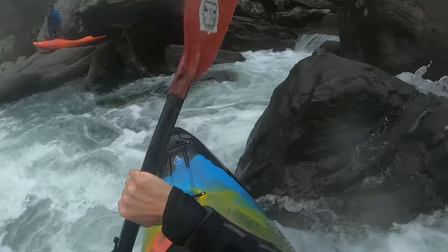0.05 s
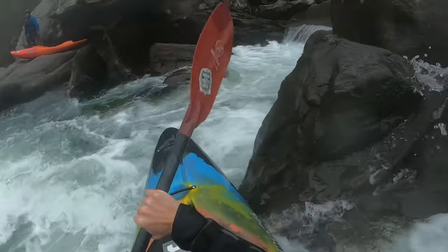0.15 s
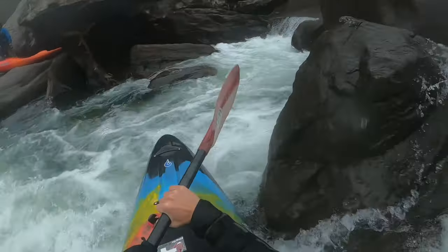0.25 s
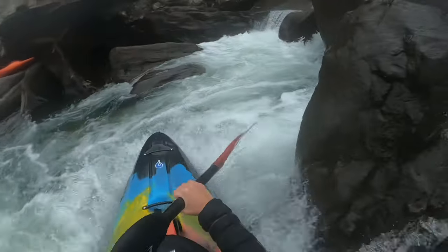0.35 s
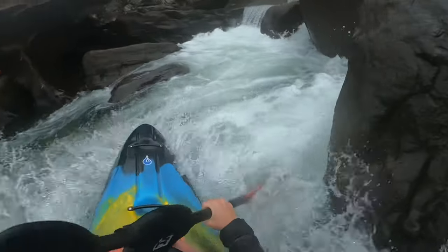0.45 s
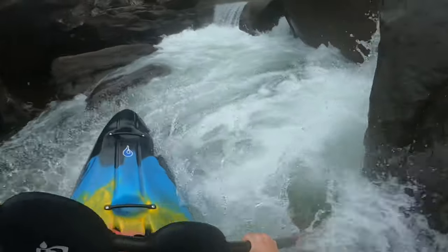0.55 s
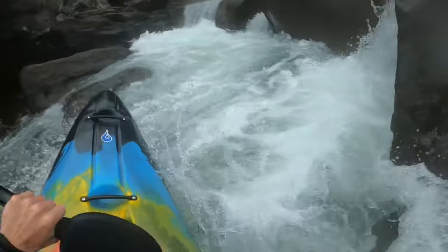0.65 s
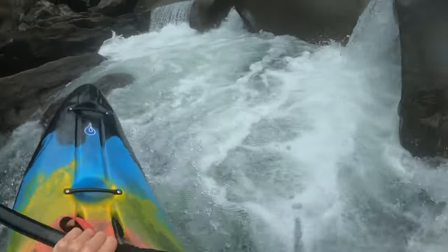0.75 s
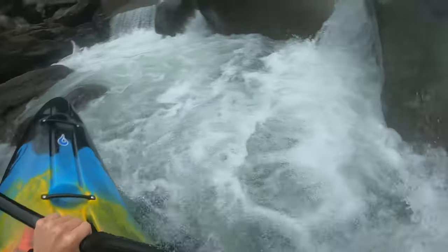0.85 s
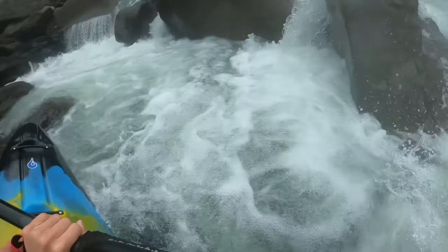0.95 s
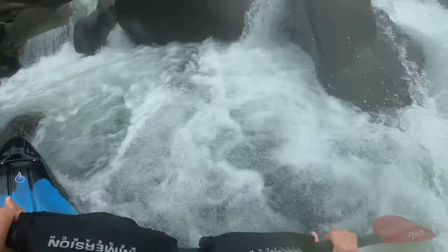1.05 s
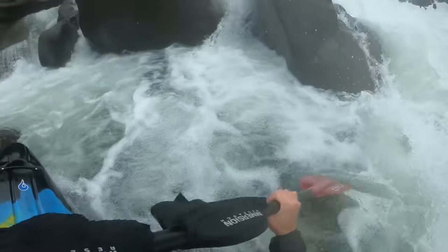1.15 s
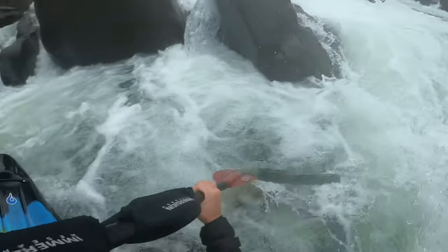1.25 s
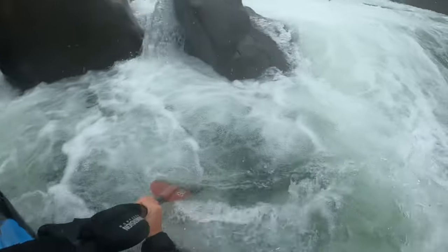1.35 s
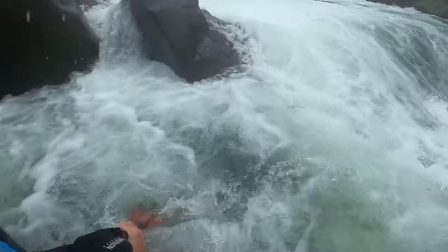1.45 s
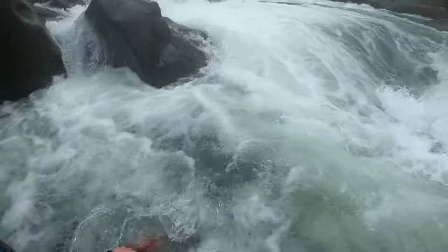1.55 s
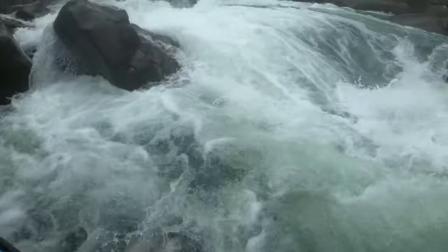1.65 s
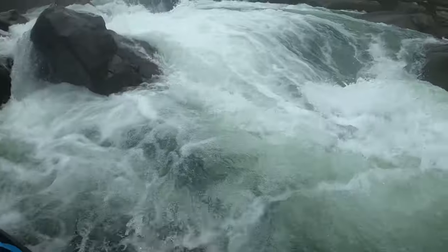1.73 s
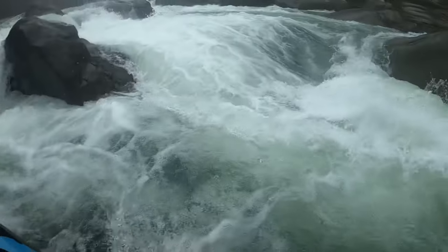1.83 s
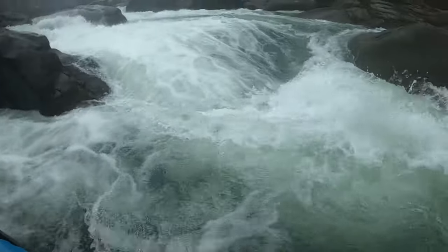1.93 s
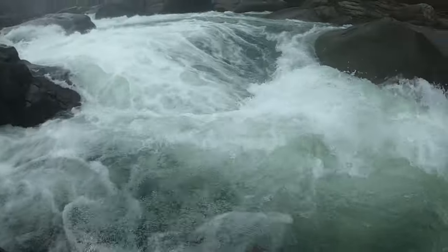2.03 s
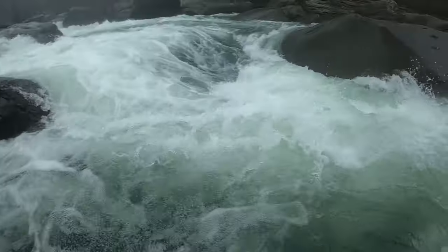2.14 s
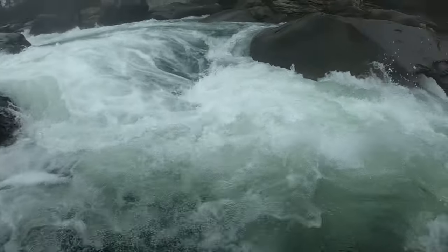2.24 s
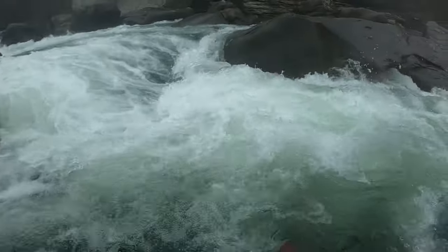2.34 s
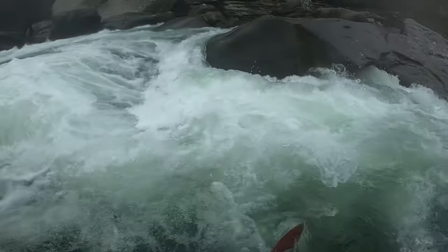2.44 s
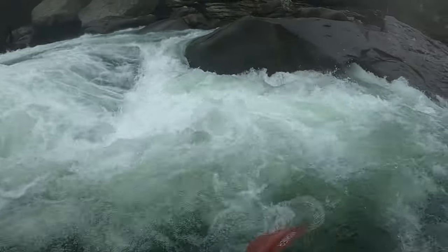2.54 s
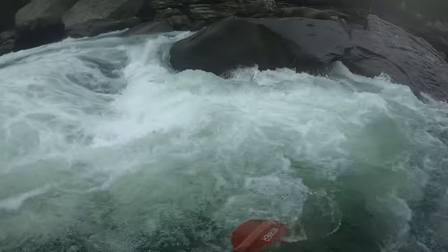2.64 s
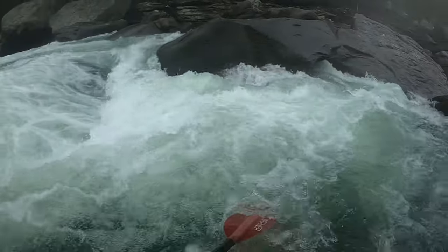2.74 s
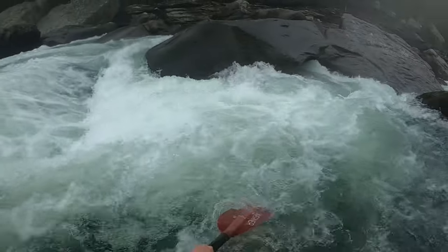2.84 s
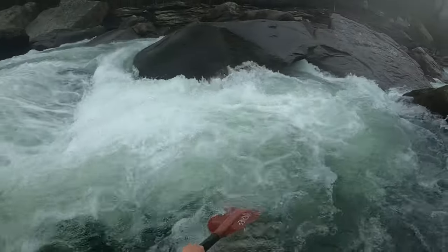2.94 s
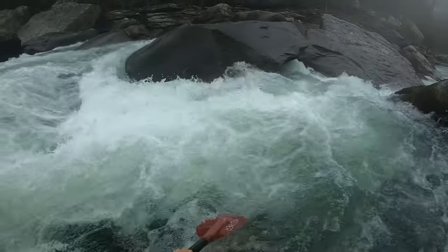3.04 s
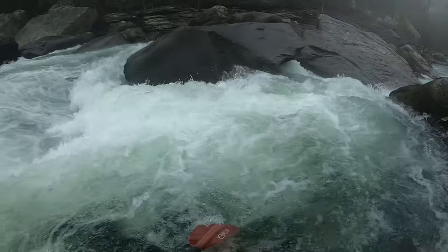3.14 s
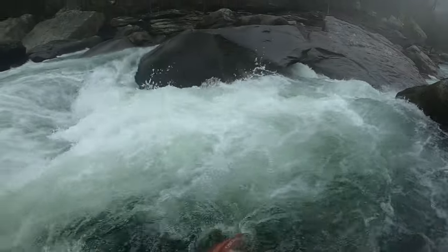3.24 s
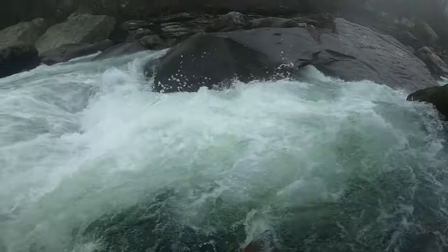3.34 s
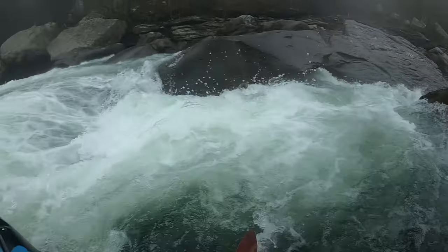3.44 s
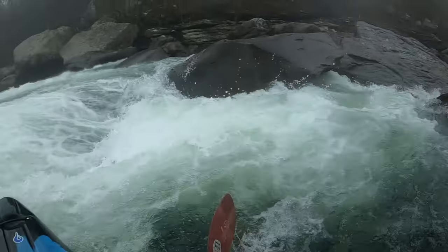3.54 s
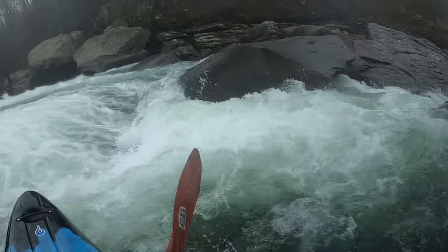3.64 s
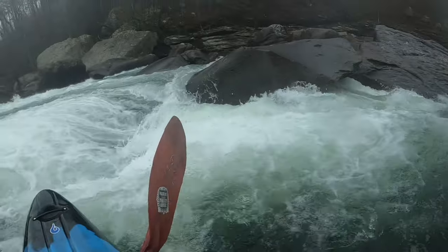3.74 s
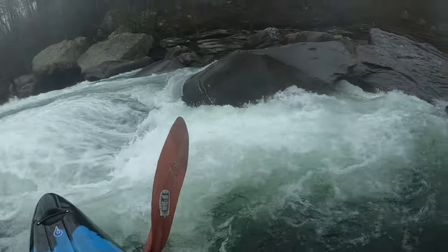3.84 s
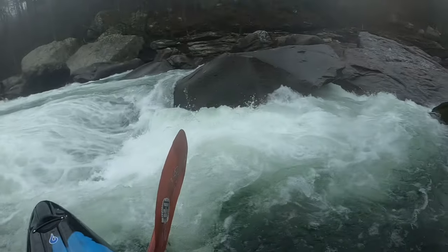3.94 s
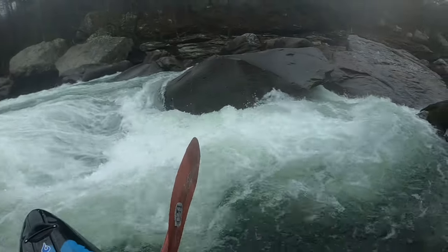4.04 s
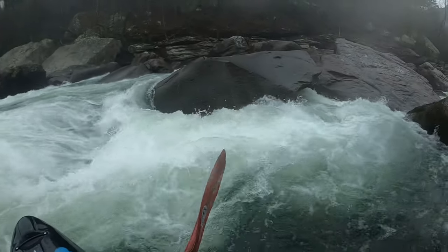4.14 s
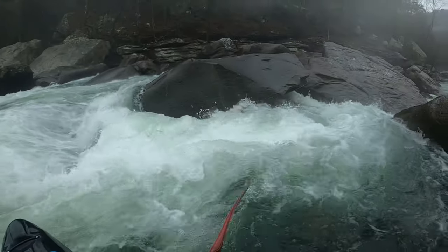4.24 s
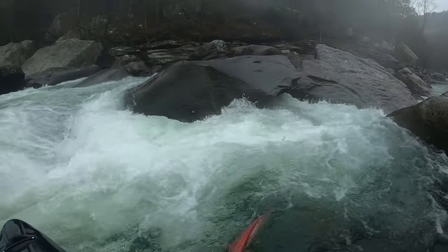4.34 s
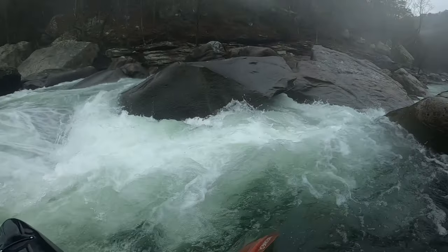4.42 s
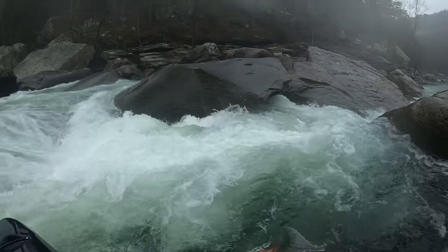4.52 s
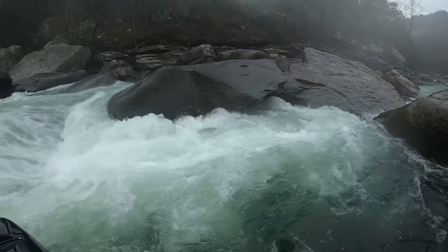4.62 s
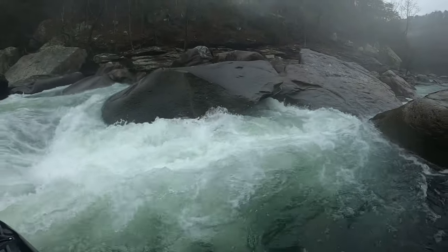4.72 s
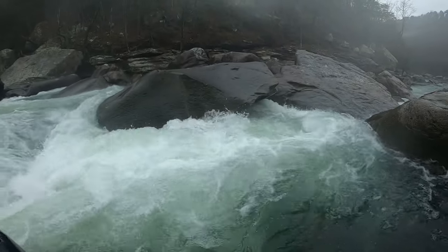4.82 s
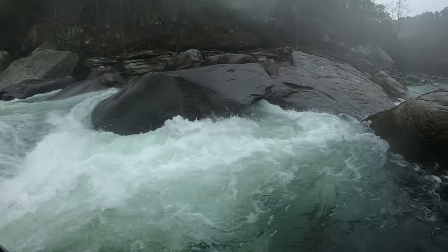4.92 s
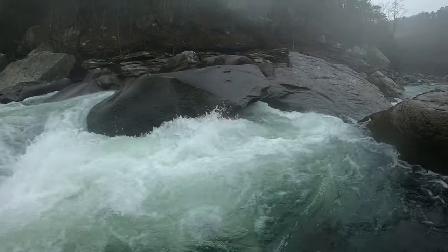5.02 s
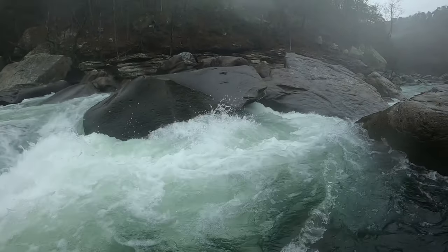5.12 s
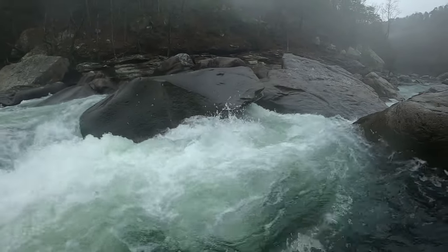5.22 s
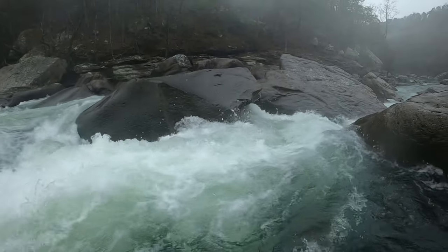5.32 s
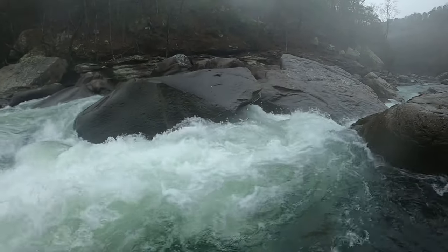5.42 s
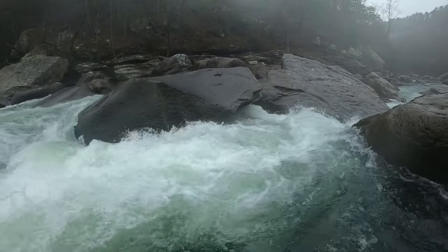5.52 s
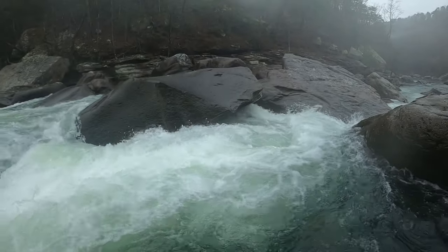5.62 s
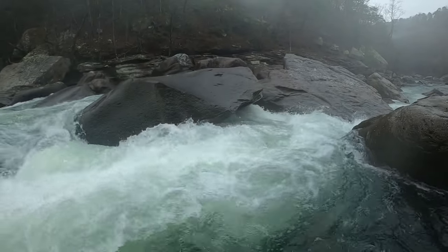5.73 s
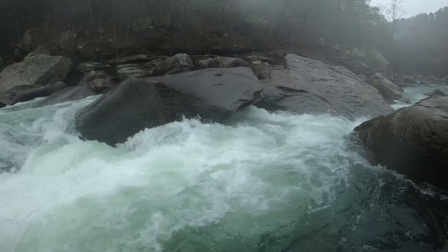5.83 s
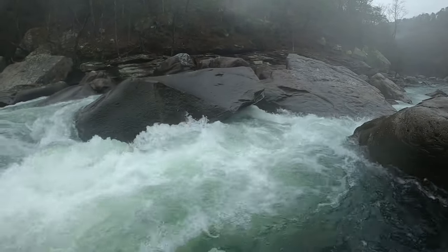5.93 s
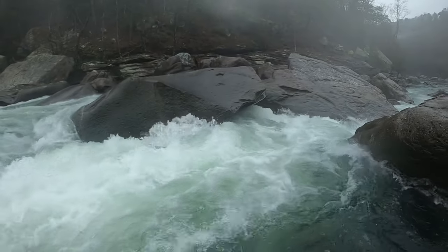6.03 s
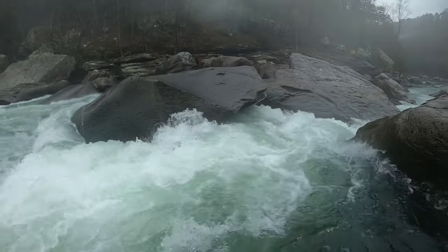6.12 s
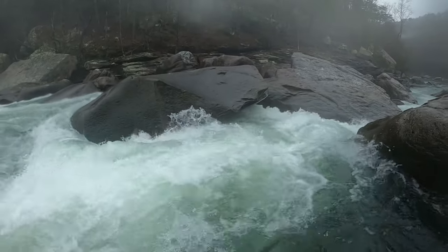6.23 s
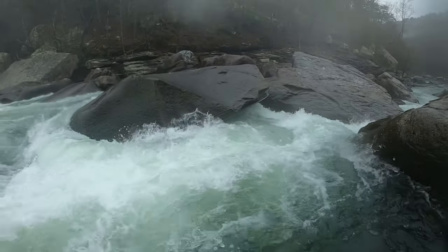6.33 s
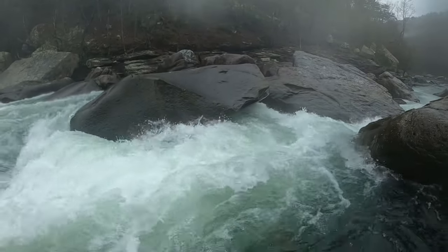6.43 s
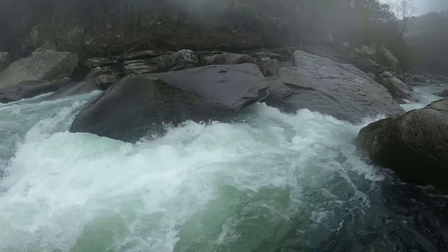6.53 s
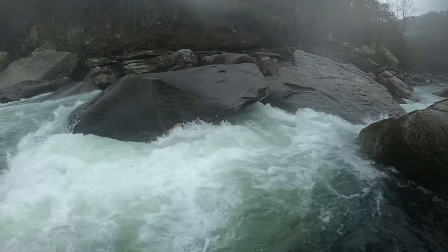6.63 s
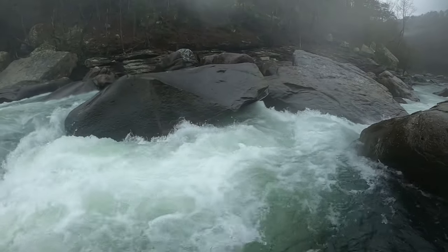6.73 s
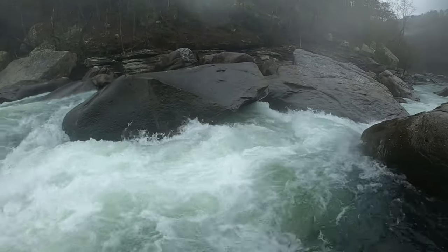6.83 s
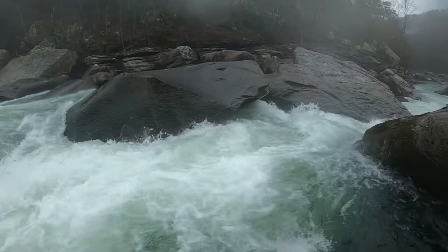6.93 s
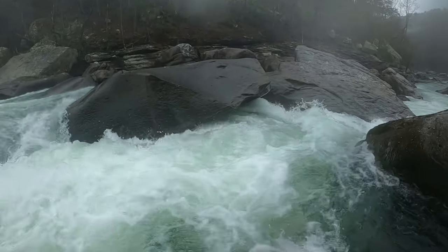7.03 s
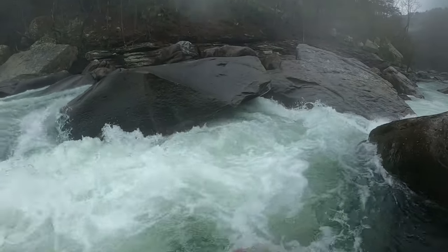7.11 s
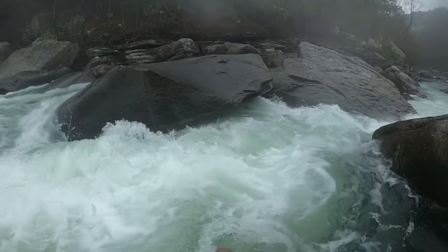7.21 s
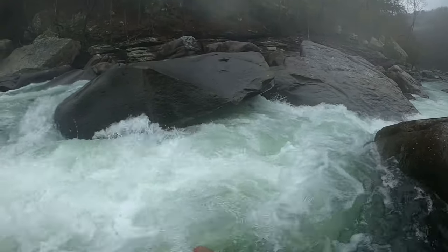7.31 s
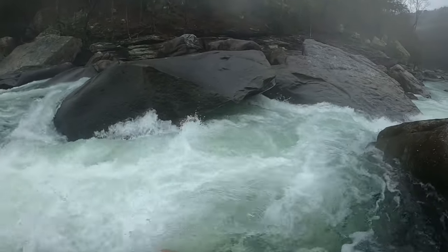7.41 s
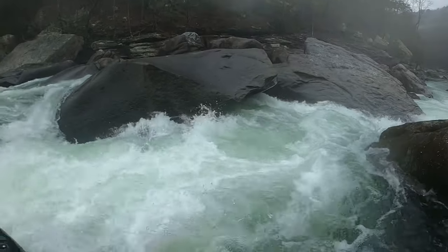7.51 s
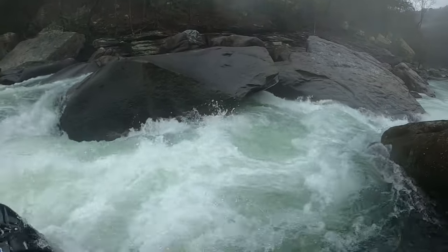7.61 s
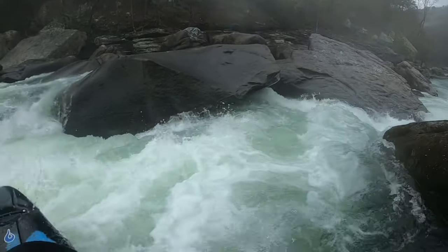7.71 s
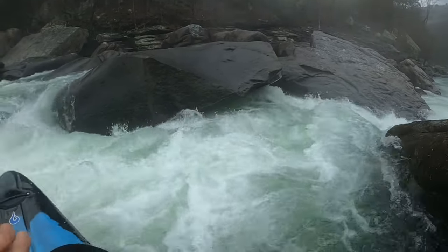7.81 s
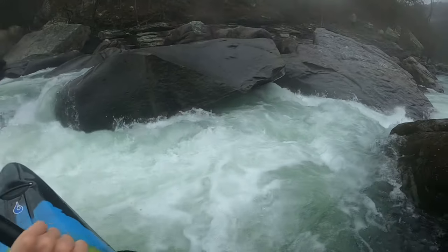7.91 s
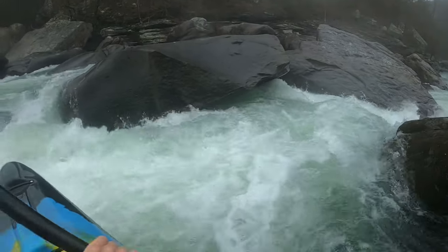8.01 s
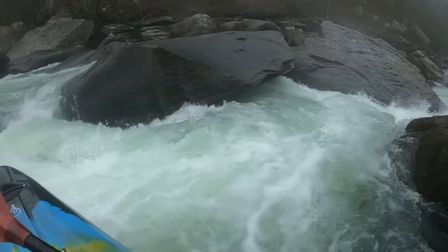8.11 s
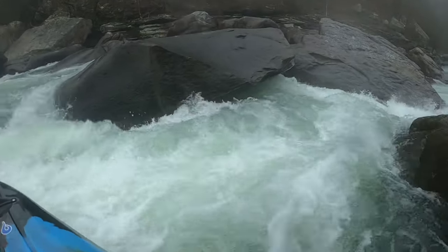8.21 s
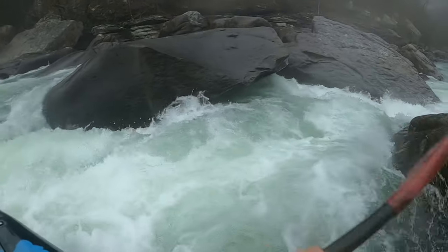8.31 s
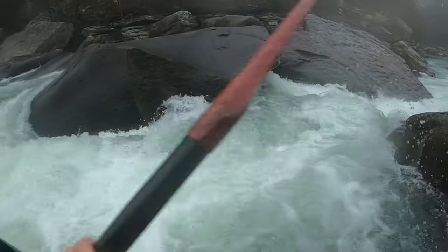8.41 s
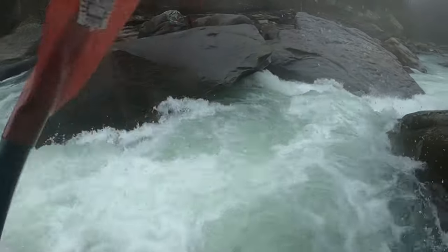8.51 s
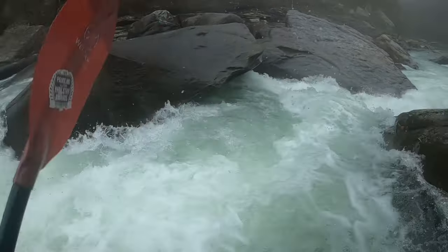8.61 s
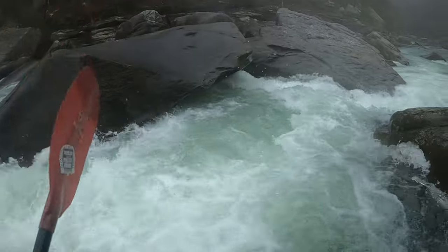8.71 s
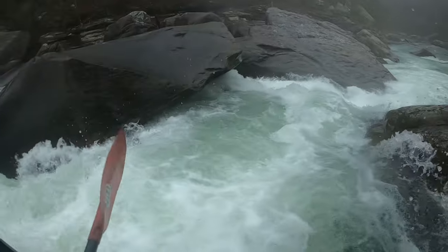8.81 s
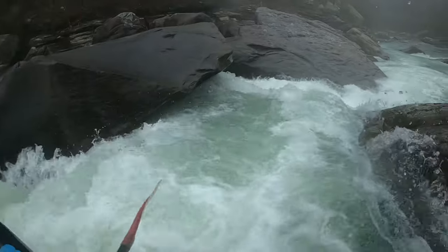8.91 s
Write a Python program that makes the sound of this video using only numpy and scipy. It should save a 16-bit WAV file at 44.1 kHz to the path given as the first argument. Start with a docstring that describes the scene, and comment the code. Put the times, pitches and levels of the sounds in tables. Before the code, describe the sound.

Outdoors in close whitewater, stereo and slightly boxy from the camera housing. It opens with clustered sharp splashes, knocks and deep thuds over broadband rushing, briefly ducked by the peaks. The foamy, bubbling churn then grows and holds wide and loud, with small blips of trapped air and soft wind buffeting. Low gurgles appear late, then the loudest smack hits and the river suddenly sounds quieter.

```python
"""A kayak runs a rapid, heard at the two microphone ports of a camera worn by the paddler.
In the first 1.6 s water slaps crack and thump amid rattling spray, ringing air pockets and gusts; the heard level sinks.
The level of the river, noise plus ringing bubbles, then rises until 4.6 s, with a few air pockets and a gust or two.
From 6.3 s come light spray, a faint slap and low glugs; at 8.7 s the hardest slap lands and the heard level drops.
A limiter ducks everything under the loudest peaks."""
import sys
import numpy as np
from scipy import signal
from scipy.fft import rfft, irfft
from scipy.io import wavfile
from scipy.ndimage import uniform_filter1d

SR = 44100
rng = np.random.default_rng(int(sys.argv[2]) if len(sys.argv) > 2 else 0)


def wrap_up_sound(samples):
    """Save the sound to the file named by the first command line argument, as 16-bit audio."""
    columns = np.atleast_2d(samples).T
    # keep every value between -1 and 1, then stretch to whole-number steps
    tamed = np.clip(columns, -1, 1)
    steps = np.round(tamed * 32767).astype(np.int16)
    wavfile.write(sys.argv[1], SR, steps)


N = 395136
TIME = np.arange(N) / SR
BINS_HZ = np.maximum(np.fft.rfftfreq(N, 1 / SR), 1)


def from_db(db):
    """Decibels to amplitude gain."""
    return 10 ** (np.asarray(db) / 20)


def rms_one(x):
    """Scale to unit power."""
    return x / np.sqrt(np.mean(x ** 2) + 1e-20)


def in_time(rows):
    """Interpolate each value column of a time curve to every sample."""
    time_s, *columns = np.transpose(rows)
    return [np.interp(TIME, time_s, column) for column in columns]


def over_bins(hz, values):
    """Join points by straight lines on a log-frequency axis."""
    return np.interp(np.log(BINS_HZ), np.log(hz), values)


def drift(rate_hz):
    """Slow chance of spread 1: noise through two equal poles, drawn at every 40th sample."""
    pole = np.exp(-80 * np.pi * rate_hz / SR)
    noise = rng.standard_normal(N // 40 + 2002)
    slow = signal.lfilter([1], [1, -2 * pole, pole * pole], noise)[2000:]  # settled part
    return np.interp(np.arange(N) / 40, np.arange(len(slow)), rms_one(slow))


def low_pass(x, cutoff_hz, order=2):
    """Causal Butterworth low-pass."""
    sos = signal.butter(order, min(cutoff_hz, SR / 2 - 1), fs=SR, output="sos")
    return signal.sosfilt(sos, x + 1e-18)


def ring(x, pitch_hz, t60_s):
    """Two-pole resonator: a unit click starts a decaying sine of height 1."""
    pole = from_db(-60 / (t60_s * SR))
    angle = 2 * np.pi * pitch_hz / SR
    return signal.lfilter([0, np.sin(angle)], [1, -2 * pole * np.cos(angle), pole * pole], x + 1e-18)


def add(track, start_s, sound):
    """Mix a sound into a track from start_s on."""
    start = max(round(start_s * SR), 0)
    track[..., start:start + sound.shape[-1]] += sound[..., :N - start]


def bubbles(rate_per_s, spread_db, cycles, pitch_count=40):
    """Near bubbles of random size and pitch each ring down 60 dB within the given cycles."""
    size_db = spread_db * np.minimum(rng.exponential(1, N), 5)
    clicks = from_db(size_db) * rng.choice([-1, 1], N)
    clicks = clicks * (rng.random(N) < rate_per_s / SR)
    dealt = rng.integers(0, pitch_count, N)
    out = 0
    for k, pitch_hz in enumerate(np.geomspace(170, 4000, pitch_count)):
        out = out + pitch_hz * ring(clicks * (dealt == k), pitch_hz, cycles / pitch_hz)
    return rms_one(out)


# Housing peaks and notches at each port: pitch_hz, width_hz, level_db
LEFT_PORT_COLOUR = [(995, 243, 12), (1404, 240, 5.5), (2040, 200, -10), (2978, 100, 6), (5940, 260, -13)]
RIGHT_PORT_COLOUR = [(836, 35, -33), (1084, 214, 10.5), (2550, 390, -2.5), (3490, 88, -14.5),
                     (4910, 550, 5.5)]
# River's likeness between ports: pitch_hz, likeness [0-1], left_lead_rad
PORT_LIKENESS = [(200, 1.0, 0.1), (330, 0.98, 0.4), (520, 0.62, 0.8), (720, 0.51, -0.6), (830, 0.72, 1.1),
                 (980, 0.89, 0.3), (1220, 0.72, 2.0), (1380, 0.34, -0.9), (1700, 0.8, -0.1),
                 (2300, 0.79, -1.0), (2650, 0.2, 0.2), (3500, 0.55, -1.3), (4400, 0.48, -2.0),
                 (6000, 0.3, -3.1)]


def at_ports(near, far):
    """Two unrelated sounds become partly alike port spectra, coloured by the housing's peaks and notches."""
    hz, likeness, left_lead_rad = np.transpose(PORT_LIKENESS)
    alike = over_bins(hz, np.clip(likeness, 0, 1))
    left = rfft(near)
    shared = alike * np.exp(-1j * over_bins(hz, left_lead_rad)) * left
    right = shared + np.sqrt(1 - alike ** 2) * rfft(far)
    colour_db = []
    for port in (LEFT_PORT_COLOUR, RIGHT_PORT_COLOUR):
        colour_db.append(sum(db / (1 + (2 * (BINS_HZ - f) / width_hz) ** 2) for f, width_hz, db in port))
    return np.array([left, right]) * from_db(colour_db)


# Spectral shape of the broken water: pitch_hz, density_db [relative, per Hz]
RIVER_SHAPE = [(40, -9), (130, -0.84), (205, -0.5), (350, -10), (500, -11), (700, -16.5), (765, -15),
               (840, -17.5), (1500, -13.5), (2000, -18.5), (3300, -15), (5200, -26), (7200, -37.5),
               (8300, -53.5), (12500, -54.5), (15000, -86)]
# Loudness of the broken water as heard: time_s, level_db [relative]
RIVER_LEVEL = [(0.04, -0.5), (0.2, -5.5), (0.66, -8), (.86, -6.5), (1.42, -11.5), (1.72, -8.5), (2.0, -8.5),
               (2.25, -5.5), (2.5, -5), (3.45, 0.5), (4.6, 1.66), (6.15, 0), (7.75, -0.76), (8.5, -2.5),
               (8.64, -1), (8.73, -10), (8.92, -11)]
# How far each bubble size follows that loudness: pitch_hz, swing_share [ratio of dB]
LEVEL_SHARES = [(200, 1.17), (1000, 1.18), (4500, 1.01)]


def river(level_db=-16, surge_db=-0.09, patchy_db=0.75, heave_db=1.5, heave_hz=300):
    """Foam noise and bubbles, in bands that follow the level curve, heave in the bass and each waver alone."""
    foam = rng.standard_normal((2, N))
    near = rms_one(foam[0] + from_db(-11) * bubbles(rate_per_s=900, spread_db=1.5, cycles=14))
    spectrum = at_ports(near, foam[1]) * from_db(over_bins(*np.transpose(RIVER_SHAPE)))
    spectrum = spectrum / np.std(irfft(spectrum, N))
    curve_db, = in_time(RIVER_LEVEL)
    follow_hz, shares = np.transpose(LEVEL_SHARES)
    centres_hz = np.geomspace(110, 7000, 13)
    surge = surge_db * drift(2.1)
    heave = heave_db * drift(7.4)
    out = 0
    for hz, band in zip(centres_hz, np.eye(len(centres_hz))):
        share = np.interp(np.log(hz), np.log(follow_hz), shares)
        band_db = curve_db * share + surge + heave / (1 + (hz / heave_hz) ** 2)
        band_db = band_db + patchy_db * drift(13.7)
        out = out + irfft(spectrum * over_bins(centres_hz, band), N) * from_db(band_db)
    return from_db(level_db) * out


# Steady draught over the ports: time_s, level_db
DRAUGHT_LEVEL = [(0, -28), (.8, -11), (1.5, -26), (4.2, -24), (6.9, -21.5), (8.5, -13), (8.9, -31)]
# Gusts as the boat drops or the paddler swings: peak_s, level_db
GUST_PEAKS = [(.04, -10), (.49, -11), (.95, -16), (2.22, -16.5), (3.95, -19), (6.44, -11), (7.24, -11.5),
              (8.39, -13), (8.66, -9.5)]


def wind(rise_s=0.11, fall_s=0.049):
    """Strength of the moving air: bell-shaped gusts add in power to the draught."""
    power = from_db(in_time(DRAUGHT_LEVEL)[0]) ** 2
    for peak_s, level_db in GUST_PEAKS:
        width_s = np.where(TIME < peak_s, rise_s, fall_s)
        power = power + from_db(level_db) ** 2 * np.exp(-((TIME - peak_s) / width_s) ** 2)
    return np.sqrt(power)


# Spectral shape of the buffeting: pitch_hz, density_db [relative, per Hz]
BUFFET_SHAPE = [(5, -1), (12, 3.5), (18, 0.5), (26, 1), (55, -6.5), (100, -22.5), (200, -34), (600, -82)]


def buffeting(side_db=-18, lumpy_db=1.0, ceiling=1.0):
    """Eddies larger than the camera push both ports nearly alike; wind sets the level above 20 Hz."""
    spectrum = rfft(rng.standard_normal((2, N))) * from_db(over_bins(*np.transpose(BUFFET_SHAPE)))
    mid, side = irfft(spectrum, N)
    audible = irfft(spectrum[0] * (BINS_HZ > 20), N)
    steady = mid / np.sqrt(uniform_filter1d(audible ** 2, size=SR // 6))
    eddies = steady + from_db(side_db) * rms_one(side) * [[1], [-1]]
    pressure = wind() * from_db(lumpy_db * drift(9.6)) * eddies
    return ceiling * np.tanh(pressure / ceiling)  # rounds off the strongest eddies


# Air pockets closing beside the boat: start_s, pitch_hz [at onset], level_db, t60_s, rise [share of pitch]
AIR_POCKETS = [(0.052, 206, -7, 0.096, .04), (0.1, 346, 1, 0.037, .04), (0.1015, 705, -12, 0.024, .04),
               (0.412, 193, 4.5, 0.047, 0.038), (0.4197, 2900, -7, 0.0049, .04),
               (0.434, 1220, 10, 0.0072, 0.49), (3.159, 1400, -8.5, 0.036, 0.06),
               (6.04, 1000, -6, .035, .03), (7.195, 1060, -8, .03, .04), (6.365, 185, 0, 0.039, .1),
               (6.366, 358, -3, 0.029, 0.085), (8.159, 187, -13.5, 0.21, .04),
               (8.267, 204, -5.5, 0.16, .04), (8.305, 172, -0.5, 0.078, .04)]


def glugs(rise_share=0.23):
    """A trapped air pocket rings at once and rises in pitch early on as it nears the surface."""
    out = np.zeros(N)
    t = TIME[:SR // 4]
    for start_s, pitch_hz, level_db, t60_s, rise in AIR_POCKETS:
        gliding_hz = pitch_hz * (1 + rise * (1 - np.exp(-t / (rise_share * t60_s))))
        fade = np.exp(-np.log(1000) * t / t60_s) * (1 - np.exp(-2 * pitch_hz * t))
        tone = np.sin(2 * np.pi * np.cumsum(gliding_hz) / SR)
        add(out, start_s, from_db(level_db) * fade * tone)
    return out


# Sheets of spray landing on the camera: start_s, length_s, level_db, brightness_hz [low-pass]
SPRAY_SHEETS = [(.090, .020, -16, 1000), (.405, .024, -14, 1200), (.843, .020, -18, 1300),
                (.884, .020, -19, 600), (.947, .024, -12, 1000), (.989, .027, -14, 750),
                (1.063, .018, -16, 700), (6.357, .022, -15, 500), (8.648, .036, -20, 700)]


def sprays(drops_per_s=900, own_share=1.0, low_hz=130, top_hz=1650, left_db=-2.5):
    """A sheet of spray is a short, dense rattle of soft drops, some on one port only."""
    out = np.zeros((2, N))
    drops = rng.standard_normal((3, N)) * (rng.random((3, N)) < drops_per_s / SR)
    drops = low_pass(drops[0] + own_share * drops[1:], top_hz, order=6)
    drops = drops - low_pass(drops, low_hz, order=1)
    for start_s, length_s, level_db, bright_hz in SPRAY_SHEETS:
        start, size = round(start_s * SR), round(length_s * SR)
        rattle = rms_one(low_pass(drops[:, start:start + size], bright_hz))
        add(out, start_s, from_db(level_db) * rattle * signal.windows.tukey(size, .25))
    return out * from_db([[left_db], [0]])


# Housing's ring under a slap: pitch_hz, level_db [before scatter], t60_s
HOUSING_MODES = [(304, -3.5, 0.016), (600, -1.5, 0.02), (1260, -1.5, 0.018), (2090, -6.5, 0.009),
                 (3000, -6.5, 0.0045), (5000, -18, 0.005), (9900, -21, .0012)]
# Water slapping the camera, the first row a soft low rumble just before the next slap: start_s, crack_db,
# brightness_hz [crack low-pass], thump_db [push, before low-pass]
WATER_SLAPS = [(0.087, -22, 500, 2), (0.1025, -1, 1000, 8), (0.4335, -7, 6000, -25), (0.5376, 3.5, 2700, 8),
               (0.5726, -15, 550, 8), (0.7172, 7, 4500, 12), (0.7895, 5, 2200, 9), (0.845, -9, 1700, -25),
               (0.8637, -0.5, 1400, 2.5), (0.9093, 2, 1900, 8), (0.9495, -4, 1200, -20),
               (0.958, -2, 950, 0), (0.965, 1.5, 1300, 9), (0.9902, -6, 1300, -20), (1.0153, 6, 3200, 11.5),
               (1.0797, -1, 1500, 10), (1.148, 8.5, 4400, 14), (1.2772, -15, 800, 6),
               (1.594, -17, 600, 4.5), (7.194, -15, 2800, -30), (8.6864, 14, 6000, 18),
               (8.7381, -4, 2800, 17.5)]


def slaps(scatter_db=2.2, left_db=-3, left_lag_s=.0001, push_hz=138, push_lag_s=0.0016,
          splat_db=-12, splat_t60_s=0.0045, splat_top_hz=3500,
          thump_hz=59, thump_t60_s=0.11, thump_spread=.04):
    """A noise splat and housing ring crack, right port first; the water's push swings as a deep thump."""
    out, count = np.zeros((2, N)), len(WATER_SLAPS)
    click = signal.unit_impulse(SR // 4)
    scatter = scatter_db * rng.standard_normal((count, len(HOUSING_MODES), 2, 1))
    splat_fade = np.exp(-np.log(1000) * TIME[:len(click)] / splat_t60_s)
    splats = rng.standard_normal((count, 2, len(click))) * from_db(splat_db) * splat_fade
    splats = low_pass(splats, splat_top_hz)
    swings_hz = thump_hz * (1 + thump_spread * rng.standard_normal(count))
    for slap, chance_db, splat, swing_hz in zip(WATER_SLAPS, scatter, splats, swings_hz):
        start_s, crack_db, bright_hz, thump_db = slap
        body = 0
        for k, (pitch_hz, level_db, t60_s) in enumerate(HOUSING_MODES):
            sign = (-1) ** (k + 1)
            body = body + sign * from_db(level_db + chance_db[k]) * ring(click, pitch_hz, t60_s)
        left, right = from_db(crack_db) * low_pass(body + splat, bright_hz)
        add(out[0], start_s + left_lag_s, from_db(left_db) * left)
        add(out[1], start_s, right)
        # a brighter slap also pushes more abruptly
        push = from_db(thump_db) * low_pass(click, push_hz * np.sqrt(bright_hz / 1000))
        # pressure follows the swing's speed
        swing = ring(push, swing_hz, thump_t60_s)
        add(out, start_s + push_lag_s, np.gradient(swing) * SR / (2 * np.pi * swing_hz))
    return out


def scene():
    """The river all round, air and water right on the camera."""
    return river() + buffeting() + glugs() + sprays() + slaps()


def limiter(x, attack_s=0.003, threshold_db=2.4, release_db_per_s=86):
    """Peaks over the threshold (dB re full scale) pull both ports down; the gain creeps back."""
    over_db = np.maximum(20 * np.log10(abs(x).max(axis=0) + 1e-9) - threshold_db, 0)
    recovery_db = release_db_per_s * TIME
    held_db = np.maximum.accumulate(over_db + recovery_db) - recovery_db
    pole = np.exp(-1 / (attack_s * SR))
    cut_db = signal.lfilter([1 - pole], [1, -pole], held_db)
    return x * from_db(-cut_db)


def record(dry, cutoff_hz=15800):
    """The limiter ducks, what exceeds full scale clips, and the top is cut."""
    clipped = np.clip(limiter(dry), -1, 1)
    return signal.sosfilt(signal.cheby2(12, 70, cutoff_hz, fs=SR, output="sos"), clipped)


dry = scene()
out = record(dry)
wrap_up_sound(out)
```